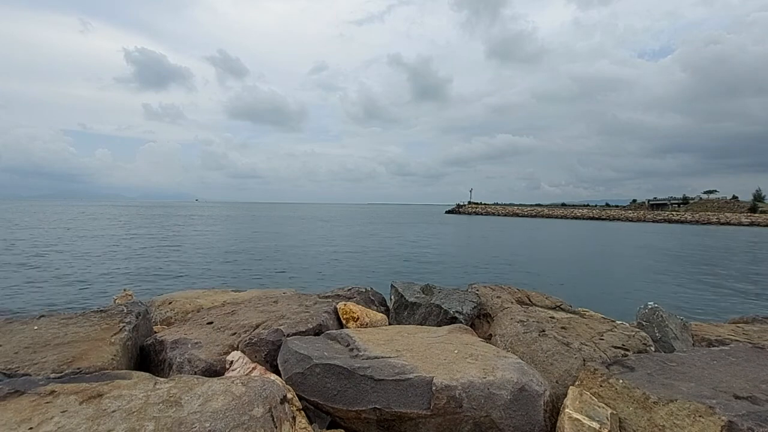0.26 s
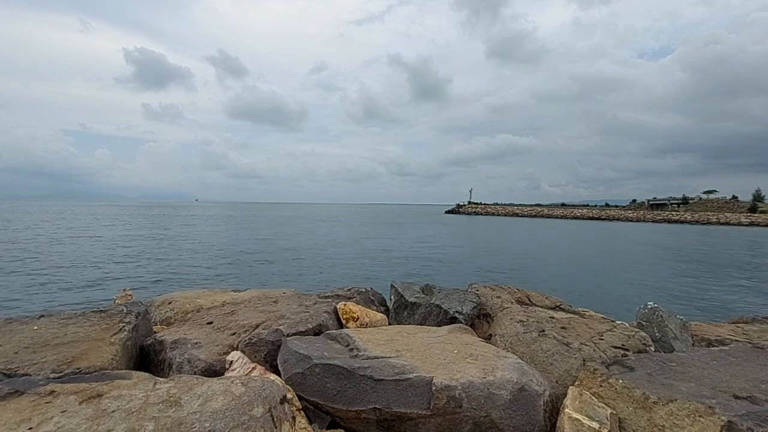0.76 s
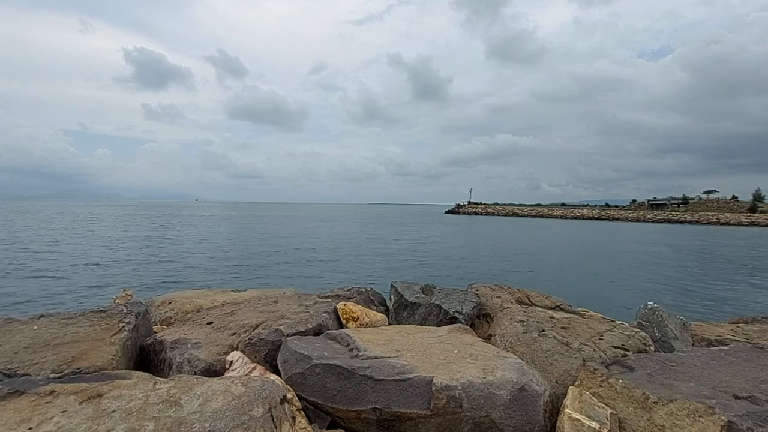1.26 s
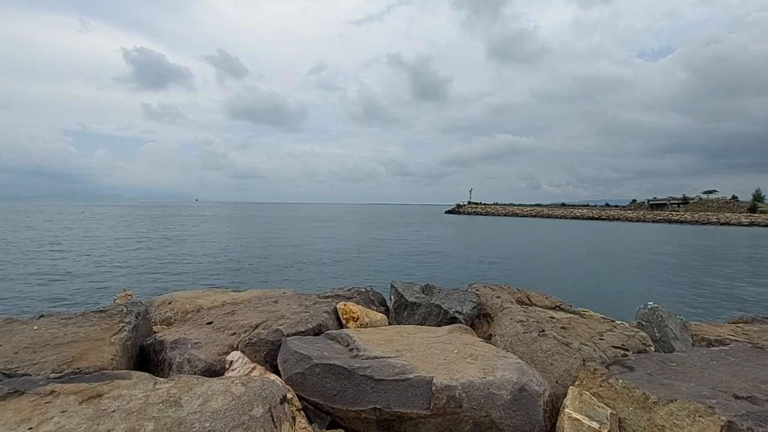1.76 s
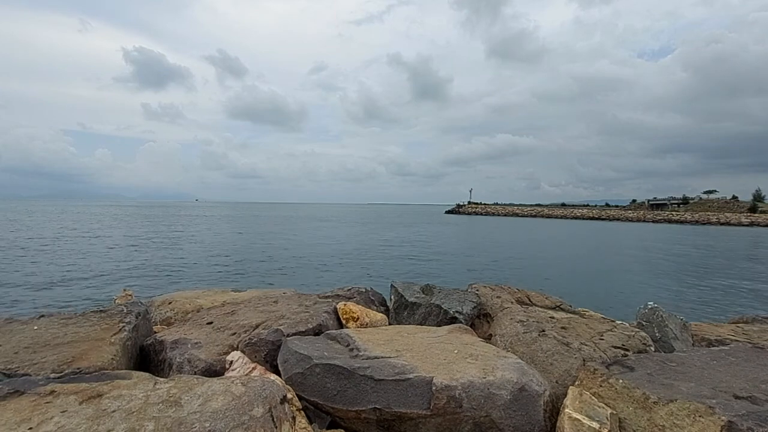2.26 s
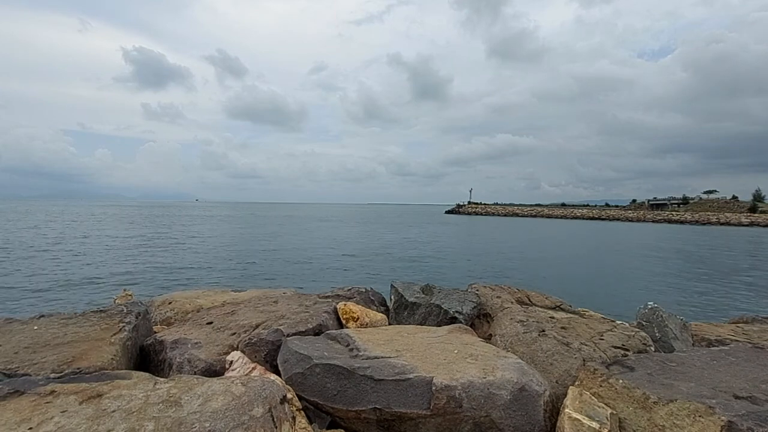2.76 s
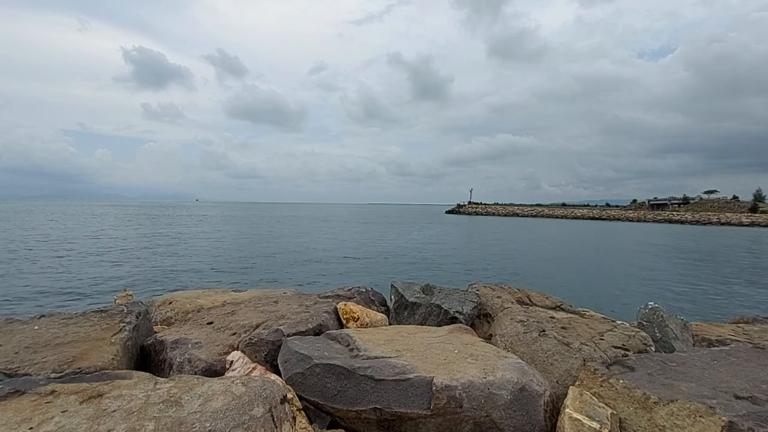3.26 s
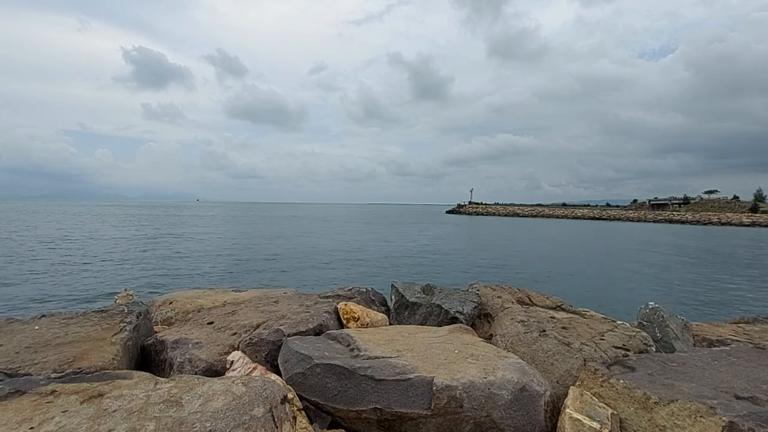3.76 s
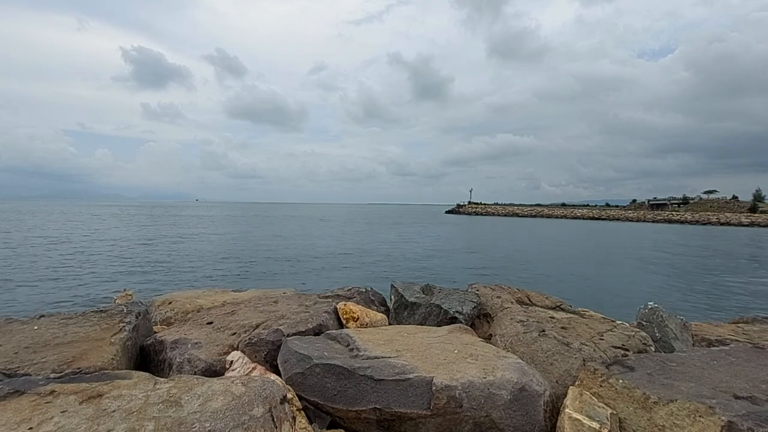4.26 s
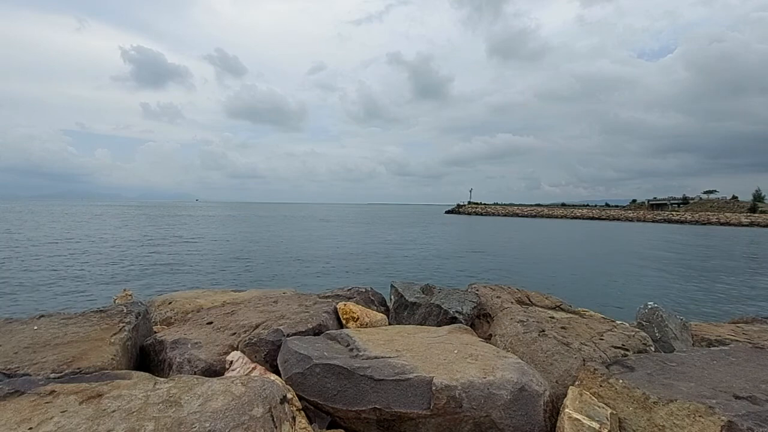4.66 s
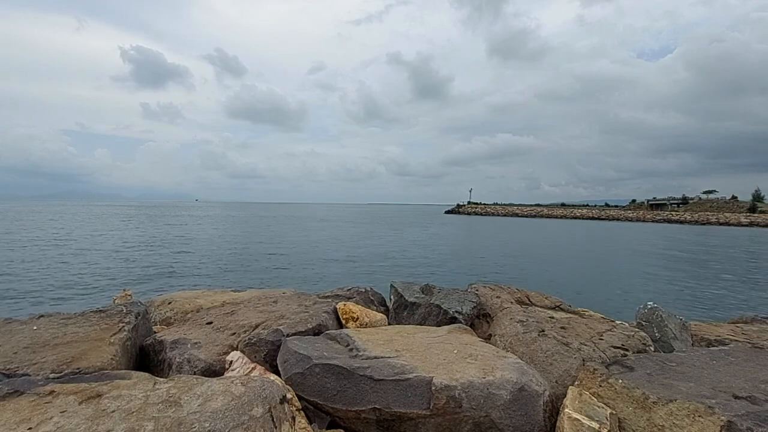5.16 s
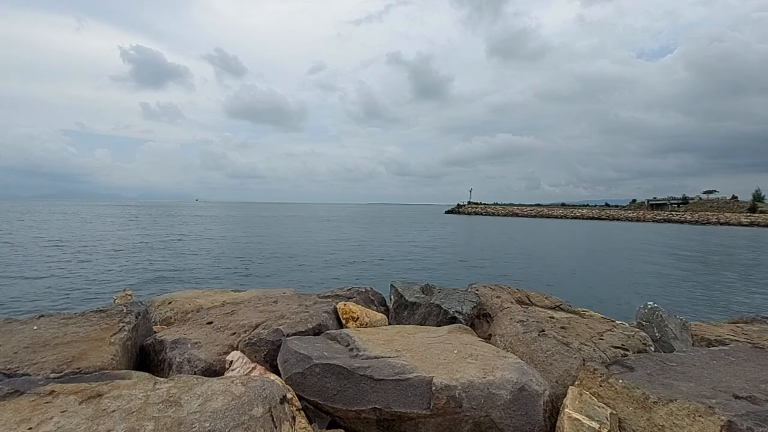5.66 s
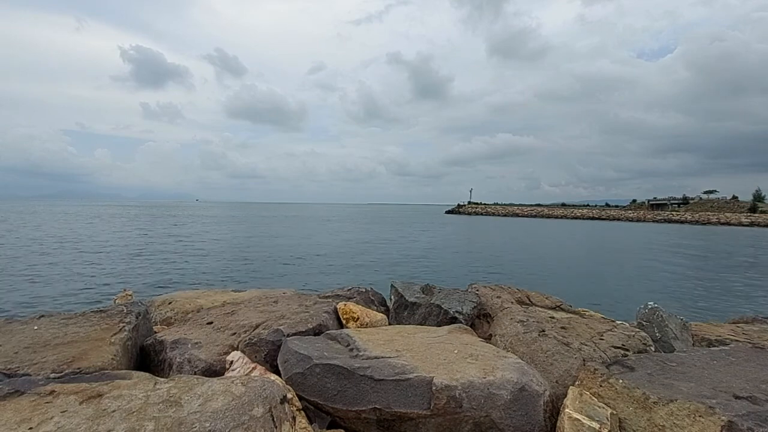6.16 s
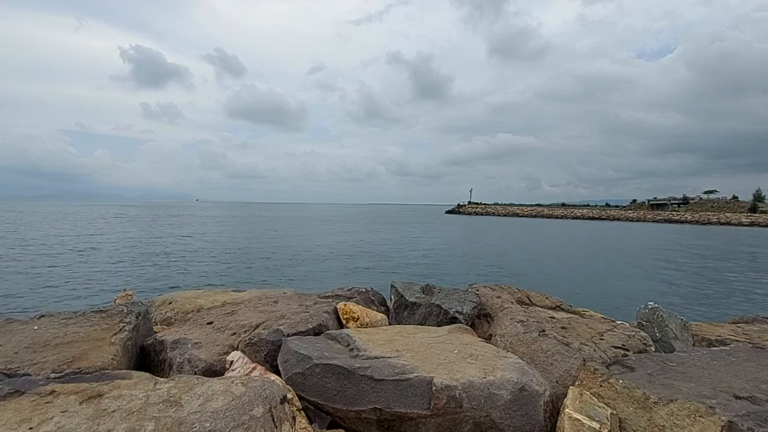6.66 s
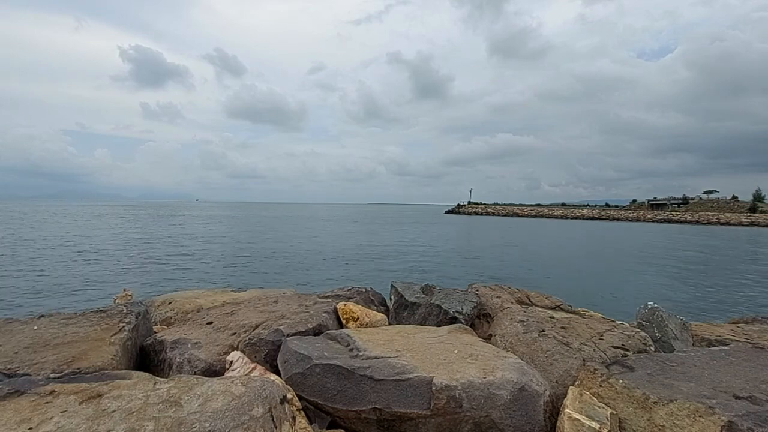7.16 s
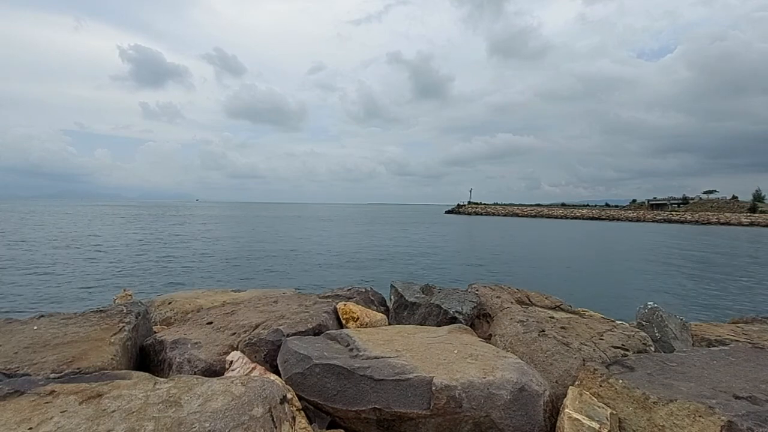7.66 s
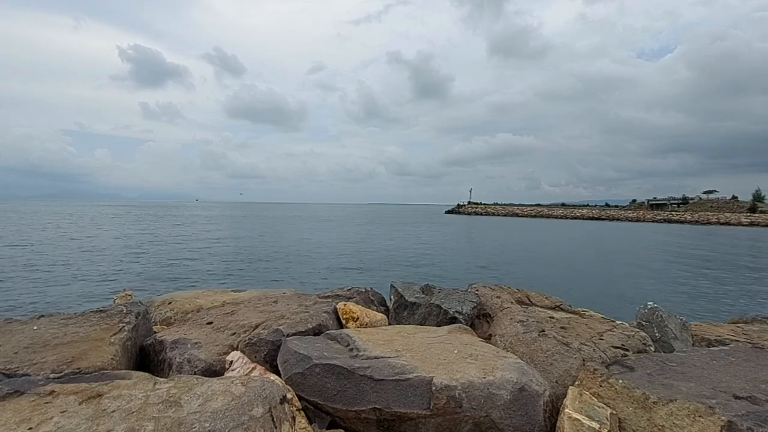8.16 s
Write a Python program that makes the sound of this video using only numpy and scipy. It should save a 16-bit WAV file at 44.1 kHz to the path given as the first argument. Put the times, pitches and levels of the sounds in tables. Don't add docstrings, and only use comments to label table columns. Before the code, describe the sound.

Water slaps and gulps between breakwater rocks over a soft low rumble as a distant ship gives two long, plain horn blasts with wavering echoes.

```python
import sys
import numpy as np
from scipy import signal
from scipy.io import wavfile

SR = 44100
rng = np.random.default_rng(int(sys.argv[2]) if len(sys.argv) > 2 else 0)


def file_out(sig):
    cols = np.atleast_2d(sig).T
    lim = np.clip(cols, -1, 1)
    pcm = np.round(lim * 32767).astype(np.int16)
    wavfile.write(sys.argv[1], SR, pcm)


def level_to_linear(level):
    exponent = np.asarray(level, float) / 20
    return 10 ** exponent


N = 370440


def rms_one(x):
    return x / np.sqrt(np.mean(x ** 2) + 1e-20)


def in_time(rows):
    s, *columns = np.transpose(rows)
    return [np.interp(np.arange(N) / SR, s, c) for c in columns]


def at_hz(points, hz):
    points = np.array(points)
    return np.interp(np.log(hz), np.log(points[:, 0]), points[:, 1])


def full(slow):
    return np.interp(np.arange(N) / 40, np.arange(len(slow)), slow)


def drift(rate):
    r = np.exp(-80 * np.pi * rate / SR)
    slow = signal.lfilter([1], [1, -2 * r, r * r], rng.standard_normal(N // 40 + 2002))
    return full(rms_one(slow[2000:]))


def pan(db):
    return level_to_linear(np.array([db / 2, -db / 2]))


def band_pass(x, low, high):
    return signal.sosfilt(signal.butter(2, [low, high], "band", fs=SR, output="sos"), x)


def resonance(x, hz, width_hz):
    r = np.exp(-np.pi * width_hz / SR)
    poles = [1, -2 * r * np.cos(2 * np.pi * hz / SR), r * r]
    return signal.lfilter(np.array([1, 0, -1]) * (1 - r * r) / 2, poles, x)


def swells(s, fall_s, edge):
    late = np.arange(0, N + 40, 40) / SR - np.array(s)[:, None]
    rise_share = 0.88
    span = np.array(fall_s)[:, None] * np.where(late < 0, rise_share, 1)
    return np.exp(-(np.abs(late) / span) ** edge)


def banded_noise(spectrum, patchy_db, rate, colours=None):
    # pitch in Hz, left-right likeness from -1 to 1.
    likeness = [(60, 0.87), (130, 0.95), (290, 0.79), (640, 0.1), (1410, -0.24), (3100, 0.0042),
                (6820, 0.031), (15000, -0.1)]
    # pitch in Hz, left-right difference in dB.
    lean = [(60, -4.5), (150, -1), (380, 0.5), (950, -4.5), (2380, -5), (5980, -1.5), (15000, 0.5)]
    first, last = spectrum[0][0], spectrum[-1][0]
    edges = np.geomspace(first, last, int(3 * np.log2(last / first)) + 1)
    white, together = rng.standard_normal((2, 2, N)), drift(rate / 4)
    out, power = 0, 0
    for k, (low, high) in enumerate(zip(edges, edges[1:])):
        mid, side = band_pass(white[k % 2], low, high)
        hz = np.sqrt(low * high)
        alike = np.clip(at_hz(likeness, hz), -.99, .99)
        mid, side = np.sqrt(1 + alike) * mid, np.sqrt(1 - alike) * side
        db = patchy_db * (0.62 * together + drift(rate))
        for j, (_, curve_db) in enumerate(colours or []):
            share = at_hz([(c[0], i == j) for i, c in enumerate(colours)], hz)
            db = db + curve_db * share
        band = level_to_linear(at_hz(spectrum, hz)) * np.array([mid + side, mid - side])
        power += np.mean(band ** 2)
        out = out + level_to_linear(db) * band * pan(at_hz(lean, hz))[:, None]
    return out / np.sqrt(power)


def swell_rumble(vigour_db):
    # pitch in Hz, level in dB per Hz.
    rumble = [(22, -29.5), (35, -12), (50, -5), (80, -5.5), (113, -0.5), (170, -4.5), (270, -9.5)]
    # middle in seconds, half length in seconds, level in dB.
    booms = [(0.316, 0.19, -46.5), (0.53, 0.11, -48), (0.93, 0.03, -46.5), (1.4, 0.047, -52),
             (1.8, 0.15, -47.5), (2.125, 0.086, -48.5), (2.405, 0.21, -51), (2.85, 0.038, -48),
             (3.017, .05, -54.5), (3.418, 0.15, -49.5), (3.595, 0.049, -47.5), (3.842, 0.11, -45.5),
             (4.234, 0.092, -52.5), (4.896, 0.047, -49.5), (5.19, 0.13, -51), (5.44, 0.041, -51),
             (5.842, 0.32, -53), (6.204, 0.19, -53), (6.604, 0.15, -46), (7.002, 0.037, -51),
             (7.2, 0.032, -46.5), (7.41, 0.054, -45.5), (7.65, .05, -49.5), (8.003, 0.16, -49.5),
             (8.318, 0.034, -49.5)]
    # middle in seconds, half length in seconds, rumble gain in dB.
    rolls = [(.97, .06, 1), (1.786, 0.13, 6.5), (2.12, .1, 5), (2.344, 0.046, 1.5), (2.753, .08, 1.5),
             (3.758, 0.039, 2.5), (4.07, .1, 0.5), (4.917, 0.2, 2.5), (6.07, 0.058, 5.5), (6.41, 0.058, 4),
             (6.878, 0.087, 3.5), (7.28, 0.043, 7)]
    edge, lull_db = 1.46, -57
    s, fall_s, db = np.transpose(booms)
    boom_db = 10 * np.log10(full(level_to_linear(2 * db) @ swells(s, fall_s, edge)) + level_to_linear(2 * lull_db))
    s, fall_s, db = np.transpose(rolls)
    rumble_db = -49.5 + vigour_db + full(db @ swells(s, fall_s, edge))
    colours = [(75, boom_db + 3.5), (110, rumble_db + 0.16)]
    low = banded_noise(rumble, patchy_db=-1.05, rate=1.6, colours=colours)
    hollow = resonance(banded_noise(rumble, patchy_db=0, rate=4.), hz=70., width_hz=13.)
    return low + level_to_linear(boom_db + 1.5) * rms_one(hollow)


def rock_wash(wash_db, vigour_db, coarse_db):
    # pitch in Hz, level in dB per Hz.
    wash = [(130, -41), (220, -11), (308, -5.5), (495, -11.5), (833, -13.5), (1010, -18), (1610, -22.5),
            (2200, -31), (3500, -52.5), (4550, -65), (7700, -120)]
    depth_db = 4.5 + 0.1 * vigour_db
    level_db = 10 * np.log10(level_to_linear(2 * wash_db) + level_to_linear(2 * (coarse_db + 3.5)))
    colours = [(450, depth_db - 3.0), (900, 0.015)]
    return level_to_linear(level_db + 5.5) * banded_noise(wash, patchy_db=1.55, rate=14.0, colours=colours)


def spray_levels(vigour_db):
    # peak in seconds, fall in seconds, level in dB, tilt towards fine mist in dB per octave,
    # left-right difference in dB.
    splashes = [(0.589, 0.072, -69.5, 0, 12), (.82, .07, -75.5, -1, 8), (.93, .06, -75.5, -1.5, 3),
                (1.04, 0.066, -75, -1, 6), (1.8, 0.044, -85.5, -10, -3.5), (2.2, 0.09, -80, -5.5, -0.5),
                (2.48, .12, -76, -3.5, 3), (3.26, 0.065, -79.5, -6, 4), (3.56, .17, -73.5, -2, 3),
                (3.85, 0.21, -77.5, -2, 2), (4.08, 0.077, -78.5, -4, 0), (4.6, 0.063, -82.5, -5, 4),
                (5.1, 0.079, -81.5, -4.5, -1), (5.26, .09, -68.5, -3, 5.5), (5.46, 0.077, -77.5, -3.5, 1),
                (5.7, .1, -82, 2, 4), (6.1, .1, -78.5, -7, 6), (6.4, 0.38, -80.5, -6.5, 0.5),
                (7.15, .03, -72, -0.5, 9.5), (7.245, 0.05, -59, -1, 4.5), (7.37, 0.075, -64, -2.5, 4),
                (7.5, 0.055, -74.5, -7, 4), (7.65, 0.079, -71, -6.5, 7), (7.86, 0.17, -84, -3, 1.5)]
    # pitch in Hz, share of the tilt in octaves.
    spray_bands = [
        (2500, -1.03),
        (4600, -0.26),
        (7400, 0.57),
        (11000, 1.6),
    ]
    s, fall_s, db, tilt, lean = np.transpose(splashes)
    shapes = swells(s, fall_s, edge=1.8)
    lapping_db, lapping_tilt = -86 + 0.95 * vigour_db, -2
    colours = []
    for hz, octaves in spray_bands:
        power = full(level_to_linear(2 * (db + tilt * octaves)) @ shapes)
        power = power + level_to_linear(2 * (lapping_db + lapping_tilt * octaves))
        colours.append((hz, 10 * np.log10(power)))
    return colours, full(level_to_linear(2 * db) * lean @ shapes) / level_to_linear(2 * colours[1][1])


def crackle(per_s, size_db):
    sizes = level_to_linear(size_db * np.minimum(rng.exponential(1, (2, N)), 5)) * rng.choice([-1, 1], (2, N))
    clicks = sizes * (rng.random((2, N)) < per_s / SR)
    return rms_one(band_pass(clicks + 1e-18, 5000, 15500))


def spray_fizz(colours, lean_db):
    # pitch in Hz, level in dB per Hz.
    fizz = [(1500, 2), (2500, 1), (4600, -2), (7400, -4), (11000, -4), (15800, -4)]
    foam_db = colours[2][1]
    out = banded_noise(fizz, patchy_db=2.06, rate=16.0, colours=colours)
    out = out + level_to_linear(-12.0 + foam_db) * crackle(per_s=530.0, size_db=4.0)
    return level_to_linear(6.0) * pan(lean_db) * out


def sea():
    # time in seconds, wash level in dB.
    surf = [(0.0, -64.5), (0.75, -65), (1.38, -65.5), (1.59, -64), (1.82, -63.5), (3.63, -59.5),
            (4.3, -59.5), (4.65, -63.5), (5.03, -63), (5.43, -62), (6.03, -61.5), (6.2, -61), (7.0, -60.5),
            (7.23, -63.5), (7.37, -64.5), (7.46, -61.5), (8.0, -64.5), (8.4, -62)]
    wash_db, = in_time(surf)
    vigour_db = wash_db - wash_db.mean()
    colours, lean_db = spray_levels(vigour_db)
    wash = rock_wash(wash_db, vigour_db, coarse_db=colours[0][1])
    return swell_rumble(vigour_db) + wash + spray_fizz(colours, lean_db)


def crack_jets():
    # middle in seconds, length in seconds, pitch in Hz, level in dB, left-right difference in dB.
    squirts = [(.15, .1, 4480, -82, 2), (0.584, 0.073, 3580, -69, 5), (.92, .12, 12500, -79.5, 9),
               (2.19, 0.07, 4540, -80, 6), (2.522, 0.092, 4600, -69, -2), (3.285, 0.11, 7600, -76.5, 1),
               (4.0, 0.18, 7440, -80.5, -1), (.85, 0.11, 8000, -85.5, 5), (3.53, .07, 4700, -73.5, 1),
               (5.26, .04, 2300, -64, 2), (5.406, .04, 2700, -69, -1), (8.102, .1, 2500, -76, -2),
               (7.246, 0.032, 3650, -56.5, 4)]
    out, t, white = 0, np.arange(N) / SR, rng.standard_normal((2, N))
    for s, length, hz, db, lean in squirts:
        swell = level_to_linear(db) * np.exp(-((t - s) / length) ** 2)
        width_hz = 0.24 * hz
        swish = rms_one(resonance(resonance(white, hz, width_hz), hz, width_hz))
        out = out + swell * pan(lean)[:, None] * swish
    return out


def add_bubble(out, s, db, hz, lean_db, cycles, rise):
    at = round(s * SR)
    t = np.arange(min(int(2 * cycles / hz * SR), N - at)) / SR
    shape = (1 - np.exp(-t * hz * 0.69)) * level_to_linear(-60 * t * hz / cycles)
    ring = shape * np.sin(2 * np.pi * hz * t * (1 + rise * t * hz / cycles))
    out[:, at:at + len(t)] += pan(lean_db)[:, None] * level_to_linear(db) * ring


def gulps_and_plops():
    # start in seconds, peak in dB, pitch in Hz.
    gulps = [
        (0.957, -38, 188.6),
        (2.119, -44, 133),
        (2.783, -38, 220),
        (3.468, -37.5, 200.6),
        (5.327, -38, 193),
        (6.2, -36.5, 255),
    ]
    # start in seconds, peak in dB, pitch in Hz, ring in cycles.
    plops = [
        (6.038, -49, 500, 40),
        (6.326, -43, 520, 45),
        (7.644, -45, 620, 14),
        (7.689, -46.5, 680, 14),
    ]
    out = np.zeros((2, N))
    for s, db, hz in gulps:
        add_bubble(out, s, db + 1., hz, -2., cycles=39.0, rise=0.085)
    for s, db, hz, cycles in plops:
        add_bubble(out, s, db + 1.5, hz, -3., cycles, rise=.12)
    return out


def drips():
    # start in seconds, peak in dB, pitch of the strongest bubbles in Hz, left-right difference in dB.
    drops = [(1.0653, -58, 11000, 12), (1.3074, -67, 7700, 2), (2.168, -63, 5000, 0),
             (3.1988, -57, 7700, 2), (3.248, -58, 5530, 2), (3.5092, -52, 4500, -1), (3.53, -58, 4200, 3),
             (3.5596, -56, 4500, -.5), (3.6269, -52, 5500, 6), (3.638, -53, 6000, 4),
             (3.7042, -54, 5000, -2), (5.6188, -64.5, 7700, -2.5), (6.0817, -51, 3500, 2),
             (6.411, -57, 4670, 0), (7.363, -43.5, 11000, -5), (7.6442, -50, 4800, -3),
             (7.69, -58, 3800, 5)]
    tick_hz = [
        [3500, 4300],
        [7200, 8200],
        [11800, 14000],
    ]
    slap_span = 1.45
    out = np.zeros((2, N))
    detune = np.exp(0.025 * rng.standard_normal((len(drops), 6)))
    slaps = rng.standard_normal((len(drops), 200)) * np.exp(-np.arange(200) / SR / 0.00082)
    for (s, slap_db, best_hz, lean), off, slap in zip(drops, detune, slaps):
        slap = band_pass(slap, best_hz / slap_span, best_hz * slap_span)
        at = round(s * SR)
        out[:, at:at + 200] += level_to_linear(slap_db - 1.5) * pan(lean)[:, None] * slap
        for hz in np.ravel(tick_hz) * off:
            db = slap_db - 13. - 11. * abs(np.log2(hz / best_hz))
            add_bubble(out, s, db + 9.5, min(hz, 14400), lean, cycles=hz * 0.0096, rise=.03)
    return out


def horn_partial(tables, multiple, edge_s, flutter_db, wander, sag=0):
    horn_hz, right_lead = 308.05, 0.63
    out, t = np.zeros((2, N)), np.arange(N) / SR
    for rows in tables:
        start, end = rows[0][0], rows[-1][0]
        gate = np.clip(np.minimum(t - start, (end - t) / 2) / edge_s + 1, 0, 1)
        level_db, lean_db = in_time(rows)
        pitch = multiple * horn_hz * (1 - sag * (1 - gate) * (t > end))
        phase = 2 * np.pi * np.cumsum(pitch) / SR + wander * drift(7.7)
        apart = right_lead / multiple + wander * drift(1.9)
        shimmer = flutter_db * np.array([drift(6.5), drift(9.)])
        wave = np.sin([phase, phase + apart])
        out += np.sqrt(2) * gate * level_to_linear(level_db + shimmer) * pan(lean_db) * wave
    return out


def ship_horn():
    # time in seconds, fundamental level in dB, left-right difference in dB.
    blasts = [
        [(1.56, -43, 2), (1.62, -39.5, 4), (1.84, -39.5, 6.5), (1.94, -42.5, 5.5), (2.03, -39.5, 5),
         (2.51, -36, 3), (2.97, -37.5, 4.5), (4.02, -36, 4.0), (4.55, -38.5, 4.0)],
        [(5.29, -39.5, 2), (5.38, -37.5, 5.0), (5.68, -41.5, 3.5), (5.82, -37, 2.5), (6.4, -38.5, 4),
         (6.61, -40, 5), (6.77, -39, 4.5), (7.81, -41, 3), (7.84, -39, 4.0)],
    ]
    # time in seconds, octave level in dB, left-right difference in dB.
    octaves = [
        [(1.58, -65, 2), (1.64, -63.5, 3.5), (2.07, -59, 0), (2.54, -63, -0.5), (2.75, -62, -4), (3.8, -61, -2),
         (4.5, -61, -3), (4.7, -73.5, -12), (5.25, -73, 0)],
        [(5.33, -65, -2), (5.5, -70, -7), (5.68, -65, -2), (6.41, -64.5, -4), (7.1, -71, -2), (7.4, -68.5, 2),
         (7.85, -66.5, -9), (8.0, -77, -11), (8.4, -69, -9)],
    ]
    fundamental = horn_partial(blasts, multiple=1, edge_s=.02, flutter_db=.45, wander=.03, sag=.06)
    octave = horn_partial(octaves, multiple=2, edge_s=.04, flutter_db=1.8, wander=.3)
    twelfth = level_to_linear(-42.) * horn_partial(blasts, multiple=3, edge_s=.04, flutter_db=3.5, wander=.4)
    return fundamental + octave + twelfth


def far_whines():
    # start in seconds, length in seconds, pitch in Hz, level in dB.
    tones = [
        (1.8, .1, 1130, -76),
        (2.3, .12, 1130, -72),
        (2.83, .22, 1265, -75),
        (3.87, .14, 1337, -71),
        (4.02, .35, 1337, -77),
        (6.97, .1, 1337, -73),
        (7.76, .26, 1337, -80),
    ]
    out, t = 0, np.arange(N) / SR
    for s, length, hz, db in tones:
        gate = np.clip(np.minimum(t - s, s + length - t) / 0.042, 0, 1)
        out = out + level_to_linear(db) * gate * np.sin(2 * np.pi * hz * t)
    return np.sqrt(2) * out * pan(-7.5)[:, None]


def shore_echo():
    # time in seconds, level in dB, left-right difference in dB.
    returns = [
        [(4.61, -47.5, 4), (4.768, -57.5, 10), (4.918, -52, 7.5), (5.102, -51.5, -4), (5.192, -48.5, 0),
         (5.23, -54, 4.0)],
        [(7.91, -56.5, 3.0), (8.104, -62.5, 13.0), (8.158, -56, -2.5), (8.246, -54, 7), (8.326, -58, -3),
         (8.4, -59, 10)],
    ]
    return horn_partial(returns, multiple=1, edge_s=.035, flutter_db=2.2, wander=.28)


def scene():
    water = sea() + crack_jets() + gulps_and_plops() + drips()
    return water + ship_horn() + far_whines() + shore_echo()


def microphones(x):
    # pitch in Hz, level in dB per Hz.
    hiss = [(2000, -6), (3000, -12.5), (4500, -12.5), (6000, -15), (8500, -14), (9500, -28.5), (15800, -11)]
    x = x + level_to_linear(-79) * banded_noise(hiss, patchy_db=2.0, rate=2.5)
    return x + .9 * resonance(x, hz=7190.0, width_hz=750.0)


def low_pass(x):
    return signal.sosfilt(signal.butter(12, 16030, fs=SR, output="sos"), x)


def record(dry):
    mix = microphones(dry)
    return low_pass(mix)


dry = scene()
out = record(dry)
file_out(out)
```